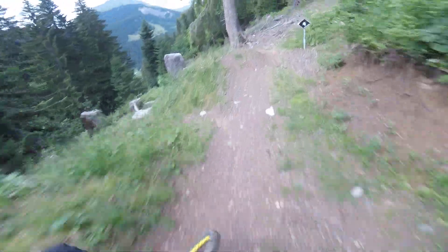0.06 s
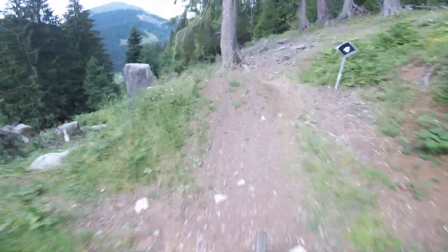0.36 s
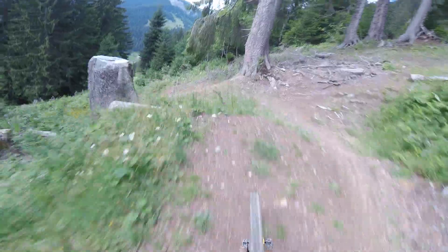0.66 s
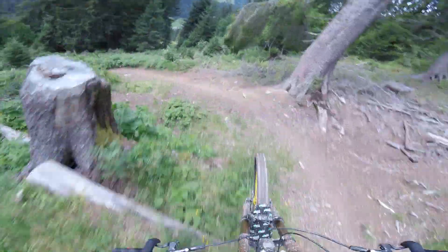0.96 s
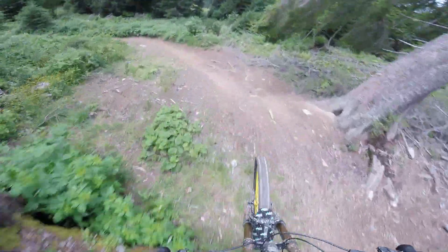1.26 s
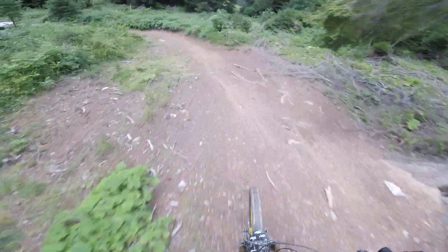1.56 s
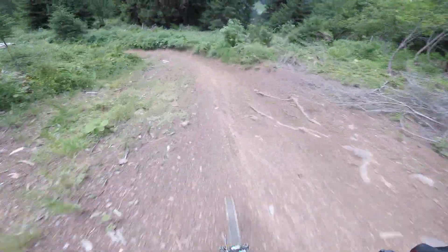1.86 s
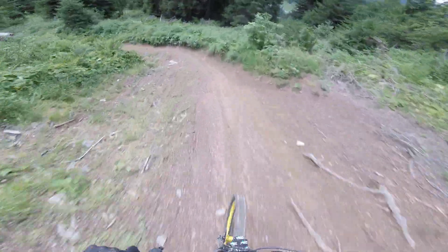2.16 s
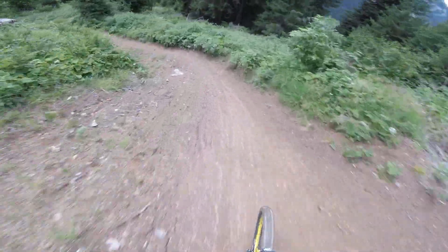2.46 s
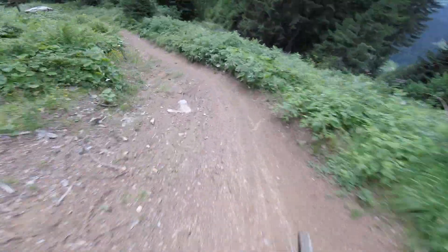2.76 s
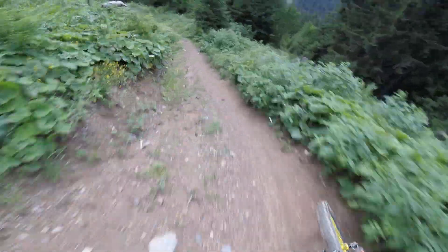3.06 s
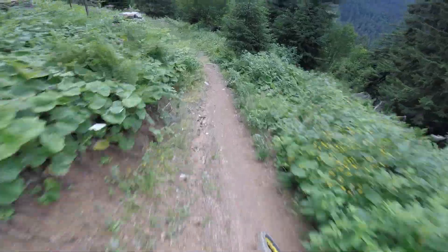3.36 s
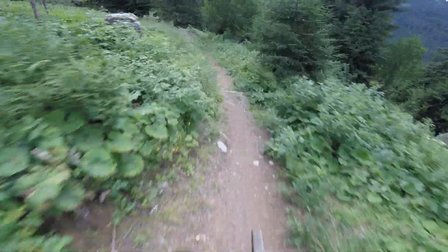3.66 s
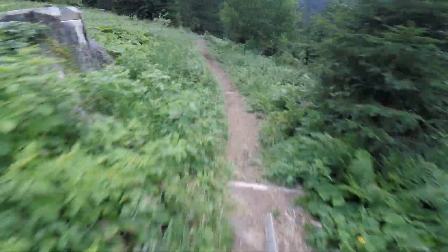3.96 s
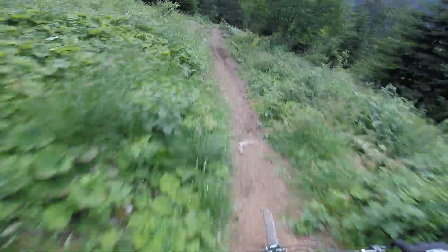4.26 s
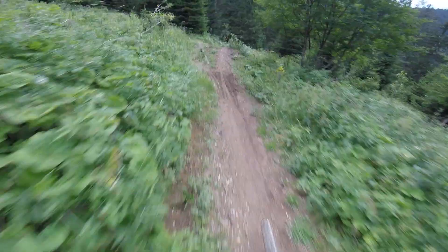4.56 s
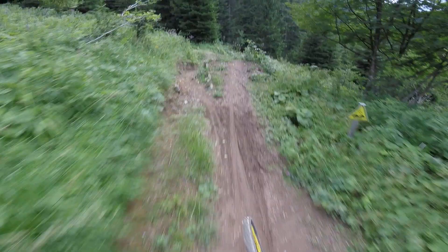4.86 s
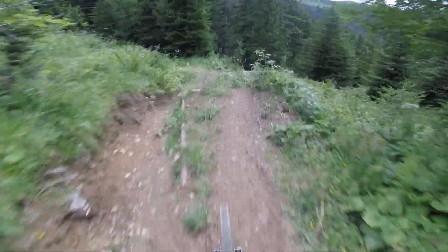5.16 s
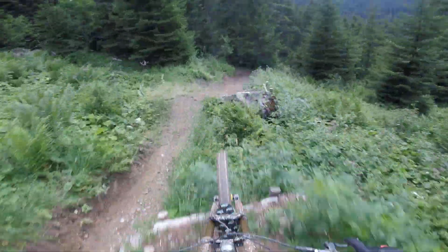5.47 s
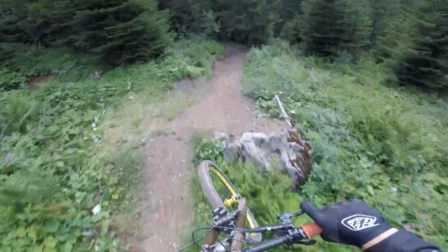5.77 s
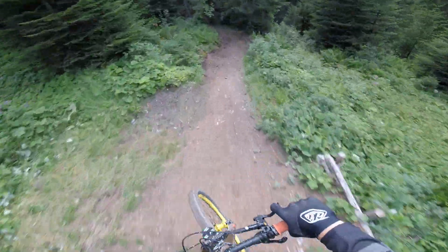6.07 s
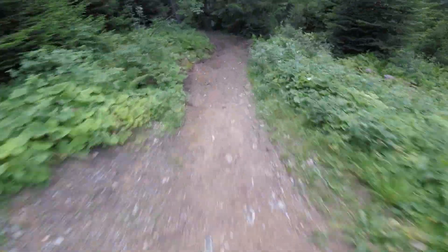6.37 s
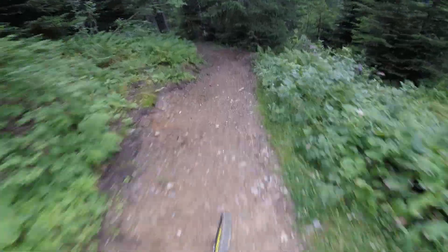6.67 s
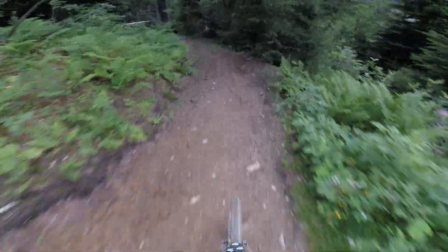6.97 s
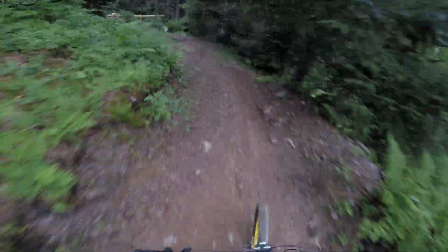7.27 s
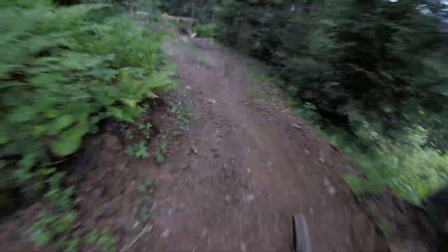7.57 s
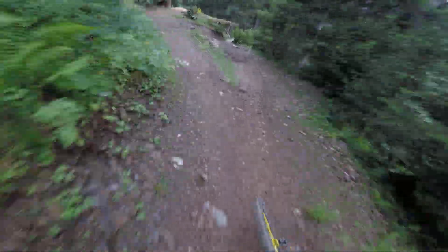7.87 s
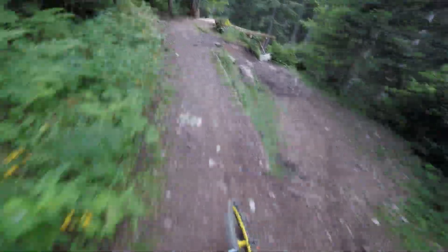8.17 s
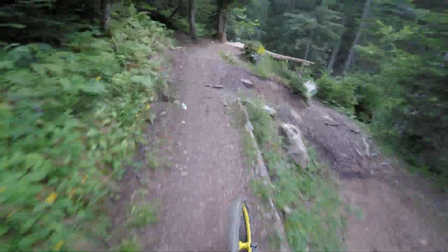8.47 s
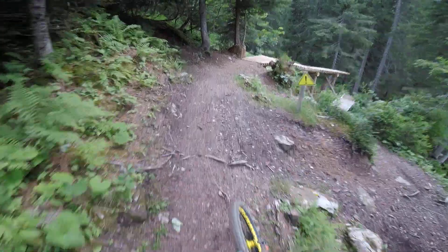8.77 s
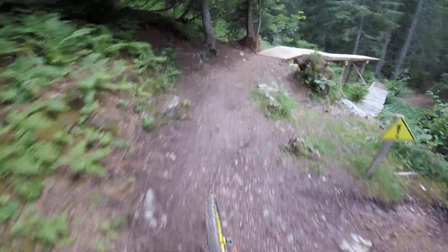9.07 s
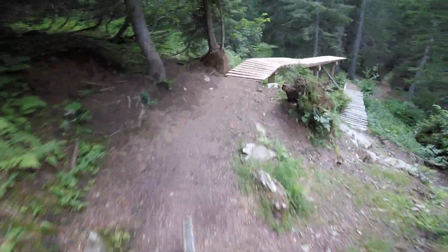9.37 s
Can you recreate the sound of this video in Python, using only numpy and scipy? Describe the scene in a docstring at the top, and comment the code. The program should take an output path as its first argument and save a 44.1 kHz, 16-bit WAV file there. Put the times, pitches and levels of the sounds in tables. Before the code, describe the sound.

Wind buffets a microphone on a fast mountain bike as tyres crunch over dirt and the frame clatters over roots and stones.

```python
"""A dirt trail, heard from a camera on the rider of a fast mountain bike.
Wind buffets the microphone, loudest of all. The tyres crunch over grit and fall quiet in the jumps.
Roots and stones make the frame clatter and the wheels ring, the chain clinks against metal, and
oil swishes through the suspension on big strokes. Behind it the freewheel's pawls sizzle
and a brake disc now and then brushes its pads."""
import sys
import numpy as np
from scipy import signal
from scipy.fft import rfft, irfft
from scipy.io import wavfile
from scipy.ndimage import uniform_filter1d

SR = 44100
rng = np.random.default_rng(int(sys.argv[2]) if len(sys.argv) > 2 else 0)


def transcribe(u):
    """Save the signal u as a 16-bit wav file named by the first command-line argument.

    u: samples, shape (n,) or (channels, n), limited to [-1, 1]; the rate is SR.
    q: integer samples, one column per channel.
    """
    v = np.clip(np.atleast_2d(u).T, -1, 1)
    q = np.round(v * 32767).astype(np.int16)
    wavfile.write(sys.argv[1], SR, q)


N = 424683
T = np.arange(N) / SR

# Air past the camera. Each row: time in seconds, share of cruising speed.
AIRSPEED = [(0, 0.91), (.9, 0.89), (1.4, 0.89), (2.3, 0.82), (3.2, 0.94), (4, 0.87), (4.5, 0.74),
            (5.25, 0.65), (5.45, 0.88), (5.9, 0.93), (6.28, 0.74), (6.9, 0.83), (7.6, 0.46), (8.4, 0.4),
            (9.63, 0.48)]
# Rumble at cruising speed. Each row: frequency in Hz, half-octave band gain in dB.
BUFFET_EQ = [(16, -15.5), (30, -1.5), (55, -2.5), (85, -3.5), (130, -6.5), (200, -16.5), (300, -41)]
# Tone of the small eddies and of a flapping gust. Each row: frequency in Hz, gain in dB.
EDDY_EQ = [(60, -32.5), (120, 6.5), (175, -1.5), (260, -5.5), (380, -15.5), (700, -27), (1500, -37.5),
           (4000, -67), (16000, -98)]
FLAP_EQ = [(90, -2), (190, 14), (330, 1.5), (480, -7.5), (800, -42), (3000, -30), (16000, -90)]
# Sharp gusts. Each row: centre in seconds, level in dB, length in seconds.
GUSTS = [(.39, -28, 0.098), (.67, -22, 0.048), (.8, -11.5, 0.024), (.88, -13.5, 0.06), (.97, -17, 0.059),
         (1.5, -27.5, 0.079), (2.67, -32, 0.13), (2.97, -23, 0.11), (3.18, -17.5, 0.06),
         (3.29, -19.5, 0.082), (3.525, -16.5, 0.043), (3.85, -22.5, 0.021), (5.52, -23.5, 0.12),
         (6.16, -24, 0.036)]
# The air stream swings onto or off the mic. Each row: centre in seconds, gain in dB, length in seconds.
SURGES = [(.2, -2.5, 0.06), (.76, -1.5, 0.061), (1.05, -1.5, 0.11), (1.18, -4, 0.029), (1.95, -5, 0.056),
          (2.48, -1, 0.089), (3.45, -2, 0.16), (3.57, -7, 0.06), (3.76, -2, 0.051), (3.9, -4, 0.041),
          (4.16, -4.5, 0.045), (4.67, -0.5, 0.05), (5.04, -4, 0.057), (5.27, -3, 0.1), (5.78, -4, 0.15),
          (6.0, -4.5, 0.057), (7.38, -1.5, .1), (7.54, 0, 0.074), (7.91, 3, .06), (7.99, -2.5, 0.065),
          (8.45, 4, 0.07), (8.55, 5, 0.065), (8.68, -4, .08), (8.85, -6, .05), (8.97, 5, 0.13),
          (9.16, -5, 0.058), (9.47, -10, 0.069)]
# Vortex flutter, gliding as the rider moves.
# Each row: start and end in seconds, first, middle and last rate in Hz, level in dB.
FLUTTERS = [(1.071, 1.875, 18.5, 58.5, 18, -14), (4.364, 4.618, 42.5, 23.4, 18, -12),
            (5.321, 5.749, 30.4, 56.1, 43, -14), (6.052, 6.399, 22.6, 41, 64.4, -12),
            (6.449, 6.946, 20.6, 23.7, 47.5, -13)]

# Tyre scrub on straight ground. Each row: time in seconds, relative level in dB.
SCRUB_FADER = [(0, -38.5), (.4, -37), (2.3, -37.5), (3.5, -39), (4, -33.5), (5.2, -35.5), (6.6, -35),
               (7.5, -35.5), (8.5, -38), (9.63, -43)]
# Loose stones, smooth dirt first and rocks later. Each row: time in seconds, level in dB against scrub.
PEBBLE_FADER = [(0, -11), (3.6, -8), (4.4, -9), (5.8, -12.5), (6.4, -7), (6.6, -3.5), (7.9, -3),
                (8.45, -8.5), (9.63, -2.5)]
# Tone of tyres on dirt, stones drumming through frame and rider, and air under the bike in a jump.
# Each row: frequency in Hz, gain in dB.
TYRE_EQ = [(120, -14), (300, 6), (560, 2.5), (800, 1.5), (1080, 0), (1400, -11), (1700, -6.5), (2030, -8.5),
           (2450, -14.5), (2750, -9), (3200, -11.5), (3800, -17.5), (4900, -19.5), (6200, -19),
           (10000, -25), (12000, -35), (15500, -44)]
THRUM_EQ = [(60, -9.5), (100, 1), (170, -2.5), (260, -7), (400, -17), (900, -62), (16000, -100)]
RUSH_EQ = [(120, -4), (300, 6.5), (600, 1.5), (1000, -2), (1400, -10), (1900, -7.5), (2500, -22.5),
           (3000, -19), (4500, -24), (8000, -24), (15500, -39)]
# Turns, ramps and landings load the tyres, crests unload them.
# Each row: centre in seconds, scrub gain in dB, length in seconds.
TYRE_LOADS = [(.6, 1.5, 0.25), (1.85, 2.5, 0.14), (2.98, 7, 0.5), (4.33, -3.5, 0.27), (5.48, 3.5, 0.46),
              (6.915, -8, 0.026)]
# Slides on loose dirt, and dust sprayed in the banked turn.
# Each row: centre in seconds, level in dB, length in seconds.
SKIDS = [(.48, -35, 0.47), (.85, -49, 0.33), (5.45, -34.5, 0.1), (7.0, -40, 0.07), (8.09, -28, 0.067),
         (8.17, -27, 0.11), (8.81, -39.5, 0.35)]
DUST_SPRAY = [(3.12, -44, 0.39)]
# Jumps. Each row: take-off and landing in seconds.
JUMPS = [(.92, 1.71), (5.6, 6.466)]

# Roots and landings shake the bike.
# Each row: start in seconds, relative level in dB, thud weight in dB, clatter t60 in seconds.
JOLTS = [(1.753, -15.5, 4, 0.077), (1.772, -20.5, 6, 0.18), (1.797, -16, 0, 0.22),
         (1.824, -18.5, 2.5, 0.14), (1.87, -22, -12, 0.38), (1.945, -27, -17, 0.14),
         (2.008, -27.5, -16, 0.072), (2.06, -20, 1, 0.12), (2.093, -25.5, -24, 0.1), (4.472, -19, -6, 0.22),
         (4.512, -19, 7, 0.11), (4.594, -20, 3, 0.3), (4.736, -20, -6, 0.21), (4.832, -17.5, -11, 0.086),
         (4.869, -16.5, -22, 0.095), (4.902, -21, -1, 0.061), (6.488, -19, 1, 0.12),
         (6.526, -17.5, -6, 0.54), (6.701, -16.5, 7, 0.062), (6.799, -18, -1, 0.086),
         (6.933, -14, 9, 0.047), (6.958, -15, 2, 0.25), (6.975, -11, -4, 0.028), (7.026, -7.5, 8, 0.17),
         (7.055, -18.5, -5, 0.055), (7.078, -14.5, 5, 0.39), (7.197, -24, -12, 0.075),
         (7.221, -19.5, -14, 0.047), (7.343, -20, -3, 0.11), (7.356, -10, 5.5, 0.17),
         (7.394, -15.5, -4, 0.057), (7.448, -8, 4, 0.12), (7.465, -18, -10, .03), (7.523, -10.5, -1, 0.15),
         (7.725, -10.5, 3, 0.28), (7.796, -8.5, 7.5, 0.15), (7.822, -9, 2, 0.26), (7.85, -16, -1, 0.12),
         (8.162, -16.5, 8, 0.13), (8.271, -25, -2, 0.092), (8.315, -24, 14, 0.061), (8.371, -20, -13, 0.18),
         (8.554, -21.5, 2, .08), (8.806, -21, -2, 0.066), (8.866, -20.5, 10, .07), (8.888, -20, 22, 0.17),
         (9.057, -25.5, -22, 0.065), (9.068, -24, -8, 0.035), (9.183, -28.5, -1, .07),
         (9.246, -31, 3, 0.064), (9.303, -26.5, -2, 0.08), (9.518, -27, -5, 0.067), (9.547, -30, -15, .07)]
# Rough ground full of small jolts. Each row: start and end in seconds, relative level in dB.
ROUGH_GROUND = [(4.521, 4.72, -26), (6.521, 6.698, -29.5), (7.228, 7.317, -29), (7.561, 7.7, -28)]
# Tone of the rattling frame. Each row: frequency in Hz, gain in dB.
FRAME_EQ = [(100, -31), (250, 8), (500, 0.5), (760, 2.5), (1080, 0.5), (1430, -10), (1800, -1.5),
            (2450, -9), (3100, -6.5), (3900, -14), (6300, -12.5), (7500, -13), (10500, -24), (12000, -46),
            (15500, -44)]
# Hard parts strike the frame.
# Each row: start in seconds, relative level in dB, tilt in dB per octave, top cut in Hz.
CLACKS = [(0.513, -16.5, 0.5, 6000), (1.829, -5.5, -18, 4000), (1.9252, -19, 8, 2800),
          (3.989, -11, -6, 2980), (4.209, -13, -5.5, 4500), (4.287, -6, -2.5, 5200), (4.4875, -7, 4, 4270),
          (4.513, -10, -9, 4500), (4.6273, -6.5, -1, 4000), (4.7345, -8, 1.5, 3900),
          (4.833, -8, -0.5, 3970), (4.87, -16, 2, 4530), (5.798, -22.5, -5, 3500), (6.505, -11, 3.5, 4200),
          (6.527, -14, -13, 4000), (6.706, -6, -4.5, 5130), (6.96, -6, -7, 3500), (6.984, -9, -2.5, 3000),
          (7.024, -8, -7, 3300), (7.031, -12, -13, 2500), (7.103, -6, -3.5, 6100), (7.172, -16, -4, 3500),
          (7.357, -10, 2, 3680), (7.449, -9, -1.5, 3300), (7.457, -9, -1, 3500), (7.521, -3, -2.5, 2780),
          (7.726, -10, -12, 3200), (7.797, -4, -9, 3500), (7.805, -6, -13, 2500), (7.824, -13, -10, 3500),
          (7.849, -8, -6, 3500), (7.86, -6, -7, 3800), (8.583, -16.5, 1.5, 3940), (8.887, -1, -4.5, 2280),
          (9.06, -14.5, -10, 5500)]
# Modes of the tubes and guards, and of the wheels and spokes.
# Each row: pitch in Hz, gain in dB, t60 in seconds.
FRAME_MODES = [(560, 2, 0.0059), (770, 6, 0.0082), (905, 8.5, 0.012), (1022, 8, 0.013), (1520, -11, 0.0062),
               (1710, -3.5, 0.011), (2070, 1.5, 0.0089), (2750, 3, 0.0076), (3055, 1, 0.017),
               (3270, -1.5, .011), (4500, -7, 0.0094), (5600, 3, 0.0088), (6240, 5, 0.0092)]
WHEEL_MODES = [(334, -33, 0.45), (508, -36, 0.3), (655, -26, 0.15), (830, -31, .08), (1030, -39, 0.035),
               (1722, -19, 0.035)]
# Direct hits on a spoke or guard. Each row: start in seconds, level in dB, pitch in Hz, t60 in seconds.
TWANGS = [(2.965, -25, 948, 0.19), (4.7335, -10, 3060, 0.027), (7.029, -24, 322, .3),
          (7.358, -24, 510, 0.41), (7.449, -20, 506, 0.33), (7.8, -26, 348.4, 0.66),
          (8.888, -20.5, 655, .13), (8.888, -8.5, 1694, 0.018)]
# Chain and flung grit hit metal. Each row: start in seconds, relative peak in dB, tilt in dB per octave.
CLINKS = [(0.511, -32, -2), (1.157, -27, -4.5), (1.755, -18.5, -1), (1.782, -21.5, -2), (1.801, -18, -4.5),
          (1.827, -16, -3), (2.008, -31, -3), (2.108, -20.5, -1.5), (3.345, -30.5, -2), (3.397, -34, 2),
          (3.802, -24, -3), (4.112, -23, -3), (4.304, -20.5, 2.5), (4.51, -19.5, -1), (4.533, -25, 2),
          (4.6, -22, 3), (4.723, -19, 0), (4.869, -15.5, -6), (4.874, -20, 1), (6.434, -24, -11.5),
          (6.4687, -30.5, 4), (6.553, -22.5, 1), (6.795, -27, 3), (7.007, -21, 1), (7.132, -19.5, -2),
          (7.249, -20, -1), (7.541, -15, -5), (7.602, -17.5, -1), (7.768, -18.5, -1), (8.346, -25, 0),
          (8.871, -28.5, 1), (9.196, -25.5, 4)]
# Big suspension strokes. Each row: centre in seconds, level in dB, length in seconds,
# whistle pitch in Hz, whistle level in dB against the squirt.
STROKES = [(0.99, -33.5, 0.04, 4680, -8), (1.96, -35.5, 0.053, 4100, -8), (4.133, -38, 0.025, 4200, -17),
           (4.197, -35, 0.025, 4300, -10), (4.69, -37, 0.041, 4120, -12), (5.538, -38.5, 0.056, 4230, -13),
           (6.684, -36, 0.032, 4070, -5), (7.644, -38, 0.032, 4100, -5), (7.968, -36, 0.02, 4180, -8),
           (8.368, -43, 0.028, 4200, -6), (8.96, -34.5, 0.02, 4200, -5)]
# Tone of a chain tick, the damper oil and the hub. Each row: frequency in Hz, gain in dB.
CHAIN_EQ = [(1200, -16), (3200, 9), (4200, -1.5), (5400, 6.5), (6700, 6.5), (7800, 0), (10700, -3),
            (12000, -22), (13600, -12), (15500, -19), (17000, -31)]
DAMPER_EQ = [(1200, -68), (2050, 7.5), (2400, -3), (2850, 5), (3500, -14), (4150, -1), (5200, -3.5),
             (6100, -5), (6700, 8.5), (7400, -8), (9400, -12), (11000, -20), (13000, -34)]
HUB_EQ = [(1300, -9), (1900, 2.5), (2450, -1), (3000, 3), (3800, -4), (4800, -5.5), (5550, 3), (5950, 2),
          (6400, 9), (7100, -10), (8200, -5.5), (9300, -1), (10600, -5), (11700, -18.5), (13400, -14),
          (15500, -23)]
# Sizzle of the coasting freewheel, swelling and fading along the trail.
# Each row: time in seconds, level in dB.
HUB_FADER = [(0, -54.5), (.9, -46.5), (1.6, -50), (4.4, -43.5), (5.1, -49), (6.4, -50.5), (7.6, -45),
             (9.63, -48.5)]
# Brake disc rubs. Each row: centre in seconds, relative level in dB, length in seconds, pitch in Hz.
DISC_RUBS = [(1.0, -53, 0.33, 4260), (1.42, -60, 0.76, 4260), (2.5, -57, .7, 4220),
             (5.97, -58.5, 0.59, 4320)]


def wind(eddy_db=-23.5, db_per_doubling=15, sway_db=-18, duck_db=3.5, flutter_db=2):
    """Slow pressure swings and buffeting duck under vortex flutter; eddies puff and gusts flap on top."""
    vortices, locked, cycle = vortex_shedding()
    sway = unit(band(rng.standard_normal(N), [5, 17], order=4))
    eddies = colour(rng.standard_normal(N), EDDY_EQ)
    puffs_db = 2 * wander(90) + 2 * wander(14) + flutter_db * (cycle - locked / 2)  # a swell per vortex
    level_db = eddy_db + db_per_doubling * np.log2(curve(AIRSPEED)) + 0.88 * bells(SURGES)
    eddies = unit(eddies * amp(puffs_db)) * amp(level_db)
    flaps = noise(FLAP_EQ) * swells(GUSTS)
    rumble = (sway * amp(sway_db) + buffeting()) * amp(-duck_db * locked)
    return rumble + vortices + eddies + flaps


def buffeting(buffet_db=-13, db_per_doubling=4, overload_speed=0.83, drive=0.41):
    """Large vortices push the diaphragm into soft saturation, deeper and quieter at low speed."""
    hz, db = np.transpose(BUFFET_EQ)
    speed = curve(AIRSPEED)
    push, power = 0, 0
    for centre in 16 * 2 ** (np.arange(9) / 2):  # half octaves, 16 to 256 Hz
        gain = amp(np.interp(np.log(centre / speed), np.log(hz), db))
        push += gain * noise_band(centre * 2 ** -.25, centre * 2 ** .25)
        power += gain ** 2
    speed_db = db_per_doubling * np.log2(np.minimum(speed / overload_speed, 1))
    return unit(np.tanh(drive * push / np.sqrt(power))) * amp(buffet_db + speed_db + bells(SURGES))


def vortex_shedding(jitter=0.0623, ragged_db=0.6, skew=0.29, fade_s=0.038):
    """Vortices peel off at a gliding, uneven rate: returns pressure, lock-in (0 to 1) and cycle."""
    pressure, locked, cycle = np.zeros((3, N))
    drift = 1 + jitter * wander(25)
    size = amp(ragged_db * wander(30))
    for start, end, first_hz, middle_hz, last_hz, db in FLUTTERS:
        on = (T > start) & (T < end)
        t = T[on]
        glide = np.polyfit([0, .5, 1], [first_hz, middle_hz, last_hz], 2)
        hz = np.polyval(glide, (t - start) / (end - start))
        phase = 2 * np.pi * np.cumsum(hz * drift[on]) / SR
        locked[on] = np.minimum(np.minimum(t - start, end - t) / fade_s, 1)
        cycle[on] = np.sin(phase) * locked[on]
        pressure[on] = unit(np.sin(phase) + skew * np.sin(2 * phase)) * size[on] * locked[on] * amp(db)
    return pressure, locked, cycle


def tyres(trim_db=2, grit_db=-4, flicker_db=2.13, thrum_db=9, rush_db=1, jump_dip_db=10.5):
    """Knobs scrub dirt, crush grit and flick pebbles; skids scrape; in a jump a dull rush takes over."""
    pebbles = pings(per_s=480, spread_db=2.2, t60=.009)
    grit = grains(per_s=1200, spread_db=2.5)
    stoniness = amp(curve(PEBBLE_FADER))
    contact = rng.standard_normal(N) + amp(grit_db) * grit + stoniness * pebbles
    rolling = unit(colour(contact, TYRE_EQ) * amp(flicker_db * wander(90)))
    crunch = colour(grains(per_s=1100, spread_db=4.5), TYRE_EQ)
    scrape = unit(band(crunch, [850, 4500])) * swells(SKIDS)
    thrum = noise(THRUM_EQ) * stoniness * amp(thrum_db)
    rush = noise(RUSH_EQ) * amp(rush_db)
    dust = noise_band(3700, 6300) * swells(DUST_SPRAY)
    height = jump_height()
    airborne = np.minimum(2 * height, 1)
    ground = (rolling + thrum) * np.sqrt(1 - airborne) + rush * np.sqrt(airborne)
    level_db = curve(SCRUB_FADER) + bells(TYRE_LOADS) - jump_dip_db * height
    return ground * amp(level_db + trim_db) + scrape + dust


def jump_height():
    """Parabolic flight: 0 on the ground, 1 at the top of each jump."""
    return sum(np.maximum(1 - ((2 * T - start - end) / (end - start)) ** 2, 0) for start, end in JUMPS)


def small_stones(per_s=22, scatter_db=6):
    """Rough ground throws up stones at uneven moments. Each row: start in seconds, level in dB."""
    stones = []
    for start, end, db in ROUGH_GROUND:
        for k, (late, size) in enumerate(rng.random((16, 2))):
            s = start + (k + late) / per_s
            if s < end:
                stones.append((s, db + scatter_db * (2 * size - 1)))
    return stones


def jolts(stones, trim_db=-4, loose_db=-7, snap_s=0.0071, lead_s=.014, squash_db=-12):
    """The tyre squashes, the bump lands and loose parts rattle out, all sounding through the frame."""
    out = np.zeros(N)
    t = T[:SR // 4] - lead_s
    after = np.maximum(t, 0)
    squash = amp(squash_db) * np.maximum(1 - (t / lead_s) ** 2, 0)
    loose_parts = grains(per_s=900, spread_db=2.2) + .9 * pings(per_s=1000, spread_db=2.2, t60=.026)
    rattle = unit(colour(loose_parts, FRAME_EQ))
    low, high = band(rattle, 310, "lowpass"), band(rattle, 1800, "highpass")
    middle = band(rattle, [600, 2500])
    small_jolts = [(s, db, -14, 0.093) for s, db in stones]  # light thud, short clatter
    for s, db, thud_db, t60 in JOLTS + small_jolts:
        i = rng.integers(N - len(t))
        part = slice(i, i + len(t))
        attack_s = 0.0069 * amp(0.063 * thud_db)  # a heavier thud builds more slowly
        edge_db = -9 - .5 * thud_db  # and has less bright edge
        attack = 1 - np.exp(-after / attack_s)
        decay = np.exp(-after / snap_s) + amp(loose_db - 60 * after / t60)
        envelope = attack * decay + squash
        blow = envelope * (middle[part] - amp(thud_db + 4) * low[part] - amp(edge_db) * high[part])
        mid_rms = np.sqrt(np.sum(band(blow, [600, 3500]) ** 2) / np.sum(envelope ** 2))
        add(out, s - lead_s, blow / mid_rms * amp(db + trim_db))
    return out


def clacks(trim_db=-11.5, chatter_db=-6, chatter_s=.0045, scatter_db=1.2, detune=.03):
    """A hard contact chatters briefly and rings the frame's damped modes, differently at each spot."""
    out = np.zeros(N)
    t = T[:SR // 16]
    hz, mode_db, t60 = np.transpose(FRAME_MODES)[:, :, None]
    polarity = (-1) ** np.arange(len(hz))[:, None]  # neighbouring modes swing in opposite directions
    for s, db, tilt, limit_hz in CLACKS:
        clack = np.zeros(len(t))
        top_cut = 1 / (1 + (hz / limit_hz) ** 6)
        for bounce in range(4):
            delay_s = chatter_s * (bounce + rng.random()) / 4 * (bounce > 0)
            pitch = hz * (1 + detune * rng.standard_normal(hz.shape))
            gain_db = mode_db + tilt * np.log2(hz / 1000) + scatter_db * rng.standard_normal(hz.shape)
            modes = polarity * top_cut * amp(gain_db) * ring(np.maximum(t - delay_s, 0), pitch, t60)
            clack += amp(chatter_db * np.sqrt(bounce)) * modes.sum(axis=0)
        add(out, s, clack / np.std(clack[:SR // 160]) * amp(db + trim_db))
    return out


def casing_thumps(hz=144, t60=0.046, trim_db=-9):
    """Each root or landing squeezes the tyre casing into one short low boom."""
    out = np.zeros(N)
    for s, db, thud_db, _ in JOLTS:
        pitch = hz * (1 + .1 * rng.standard_normal())
        add(out, s, amp(db + thud_db + trim_db) * ring(T[:SR // 4], pitch, t60))
    return out


def wheels(blows, send_db=-25):
    """The wheels ring on after every blow; a direct hit twangs one spoke or guard."""
    t = T[:SR // 2]
    response = sum(amp(db) * ring(t, hz, t60) for hz, db, t60 in WHEEL_MODES)
    out = amp(send_db) * signal.fftconvolve(blows, response)[:N]
    for s, db, hz, t60 in TWANGS:
        add(out, s, amp(db) * ring(t, hz, t60))
    return out


def chain(stones, trim_db=0.5, stone_db=-3, attack_s=.0006, snap_s=.003, tail_db=-14, tail_s=0.03):
    """Links strike metal with a bright tick and a brief shiver; small stones set them off too."""
    out = np.zeros(N)
    t = T[:SR // 12]
    attack = 1 - np.exp(-t / attack_s)
    decay = np.exp(-t / snap_s) + amp(tail_db) * np.exp(-t / tail_s)
    for s, db, tilt in CLINKS + [(s, db + stone_db, 0) for s, db in stones]:
        eq = [(hz, gain + tilt * np.log2(hz / 6000)) for hz, gain in CHAIN_EQ]
        tick = colour(rng.standard_normal(len(t)) * attack * decay, eq)
        add(out, s, tick / np.abs(tick).max() * amp(db + trim_db))
    return out


def suspension(width_hz=320):
    """Oil squirts through the damper ports on each stroke, with a brief whistle."""
    oil = noise(DAMPER_EQ)
    out = np.zeros(N)
    for s, db, length, hz, whistle_db in STROKES:
        near = np.abs(T - s) < 2 * length
        whistle = noise_band(hz - width_hz / 2, hz + width_hz / 2, samples=N // 20)
        flow = swells([(s, db, length)])[near]
        out[near] += (oil[near] + amp(whistle_db) * np.resize(whistle, len(flow))) * flow
    return out


def freewheel(pawl_hz=220, wobble=0.29, load_share=0.47, pedal_s=(9.0, 9.45), pedal_dip_db=24):
    """Pawls snap over the ratchet and sizzle in the hub, dropping away while a pedal stroke locks them."""
    phase = np.cumsum(pawl_hz * (1 + wobble * wander(40))) / SR % 1
    sizzle = unit(colour(rng.standard_normal(N) * np.exp(-phase), HUB_EQ))
    pedalling = uniform_filter1d(1. * ((T > pedal_s[0]) & (T < pedal_s[1])), size=1500)
    level_db = curve(HUB_FADER) + load_share * bells(TYRE_LOADS) - pedal_dip_db * pedalling
    return sizzle * amp(level_db)


def brake_disc(trim_db=3, width_hz=270):
    """The disc brushes its pads with a faint, narrow whirr."""
    return sum(noise_band(hz - width_hz / 2, hz + width_hz / 2) * swells([(s, db + trim_db, length)])
               for s, db, length, hz in DISC_RUBS)


def grains(per_s, spread_db):
    """Tiny clicks at random moments, mostly small and a few large."""
    out = np.zeros(N)
    moment, chance, side = rng.random((per_s * N // SR, 3)).T
    size = amp(spread_db * np.minimum(-np.log(1 - chance), 4))
    out[(moment * N).astype(int)] = size * np.sign(side - .5)
    return unit(out)


def pings(per_s, spread_db, t60):
    """Small hard pieces collide at random, each ringing briefly at a pitch of its own."""
    hz = np.geomspace(450, 6500, 300)[:, None]
    rings = np.sqrt(hz) * ring(T[:SR // 40], hz, t60)
    moment, chance, pitch, side = rng.random((per_s * N // SR, 4)).T
    sizes = amp(spread_db * np.minimum(-np.log(1 - chance), 4)) * np.sign(side - .5)
    out = np.zeros(N)
    for s, size, k in zip(moment * N / SR, sizes, (pitch * len(hz)).astype(int)):
        add(out, s, size * rings[k])
    return unit(out)


def ring(t, hz, t60):
    """A sine that dies by 60 dB in t60 seconds."""
    return amp(-60 * t / t60) * np.sin(2 * np.pi * hz * t)


def noise(eq):
    """Noise through an EQ curve, at rms 1."""
    return unit(colour(rng.standard_normal(N), eq))


def noise_band(low_hz, high_hz, samples=N):
    """Band-passed noise at rms 1."""
    return unit(band(rng.standard_normal(samples), [low_hz, high_hz]))


def colour(x, eq, size=8192):
    """Minimum-phase EQ through (Hz, dB) points, built from its cepstrum."""
    hz, db = np.transpose(eq)
    f = np.maximum(np.fft.rfftfreq(size, 1 / SR), 1)
    gain = amp(np.interp(np.log(f), np.log(hz), db)) * np.minimum(f / hz[0], 1)
    cepstrum = irfft(np.log(gain))
    cepstrum[1:size // 2] *= 2
    cepstrum[size // 2 + 1:] = 0
    return signal.fftconvolve(x, irfft(np.exp(rfft(cepstrum))))[:len(x)]


def band(x, hz, kind="bandpass", order=2):
    """Butterworth filter."""
    return signal.sosfilt(signal.butter(order, hz, kind, fs=SR, output="sos"), x)


def wander(rate_hz):
    """Smooth random modulation at rms 1."""
    k = max(int(SR / rate_hz), 1)
    return unit(uniform_filter1d(np.repeat(rng.standard_normal(N // k + 1), k), k)[:N])


def curve(table):
    """Automation line through (seconds, value) points."""
    return np.interp(T, *np.transpose(table))


def bells(table):
    """Sum of bell curves. Each row: centre in seconds, height, length in seconds."""
    return sum(height * np.exp(-(2 * (T - s) / length) ** 2) for s, height, length in table)


def swells(table):
    """Bell-shaped swells out of silence, with their peaks given in dB."""
    return bells([(s, amp(db), length) for s, db, length in table])


def amp(db):
    """Decibels to gain."""
    return 10 ** (np.asarray(db) / 20)


def unit(x):
    """Scale to rms 1."""
    return x / np.sqrt(np.mean(x ** 2))


def add(track, s, sound):
    """Mix a sound in at s seconds."""
    i = max(int(s * SR), 0)
    track[i:i + len(sound)] += sound[:N - i]


def scene():
    """A close, dry mono mix: everything is within a metre or two of the microphone, in open air."""
    stones = small_stones()
    blows = jolts(stones) + clacks()
    bed = wind() + tyres() + freewheel() + brake_disc()
    hits = blows + casing_thumps() + wheels(blows) + chain(stones) + suspension()
    return (bed + hits)[None]


def record(dry, ceiling=0.76, top_hz=15500):
    """The camera rounds the highest peaks and cuts the top."""
    rounded = dry / (1 + (dry / ceiling) ** 6) ** (1 / 6)
    return signal.sosfilt(signal.ellip(8, .2, 70, top_hz, fs=SR, output="sos"), rounded)


dry = scene()
out = record(dry)
transcribe(out)
```